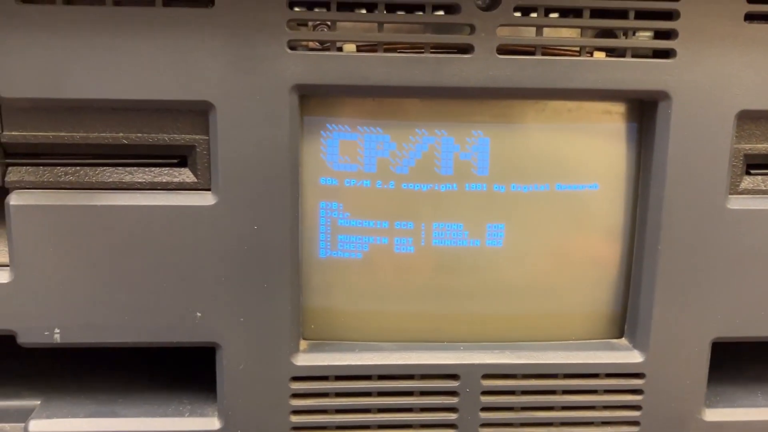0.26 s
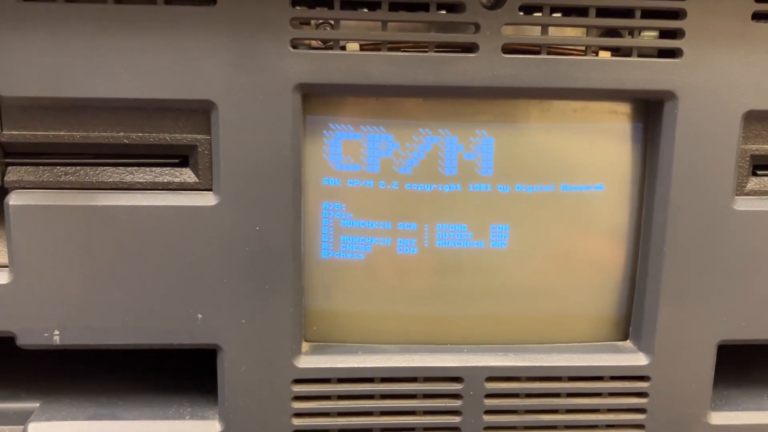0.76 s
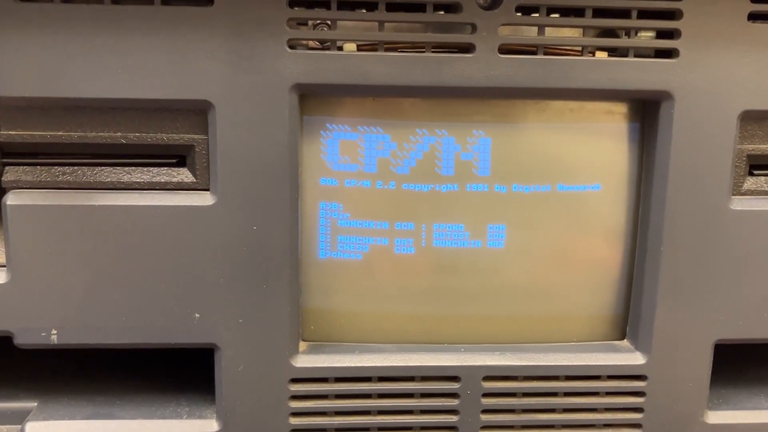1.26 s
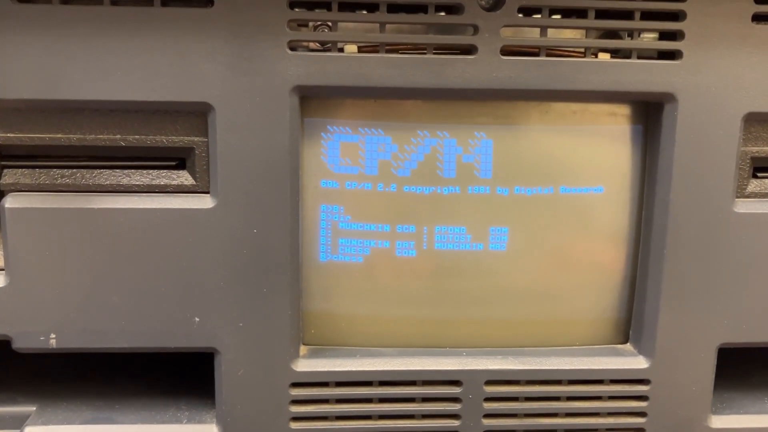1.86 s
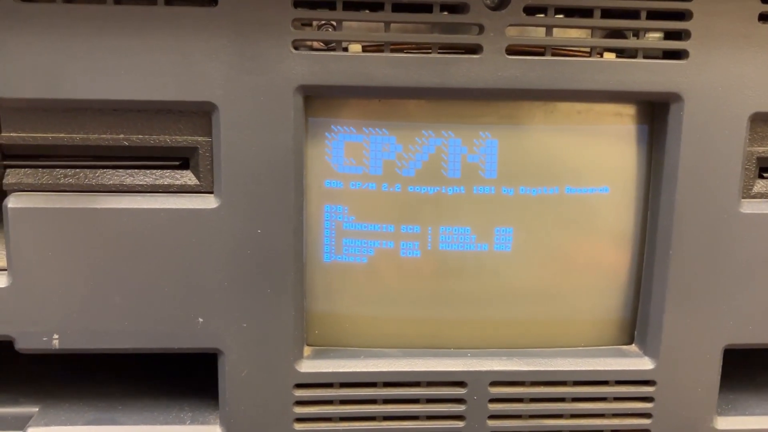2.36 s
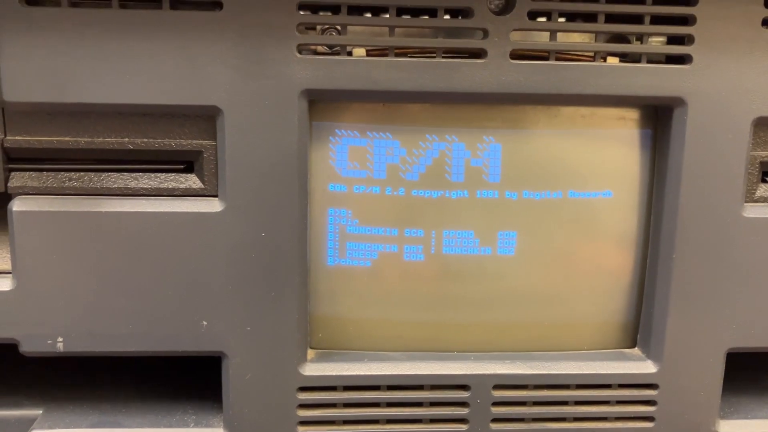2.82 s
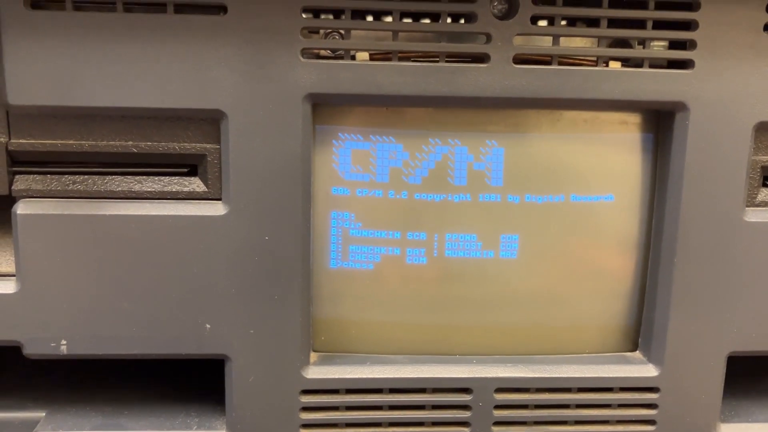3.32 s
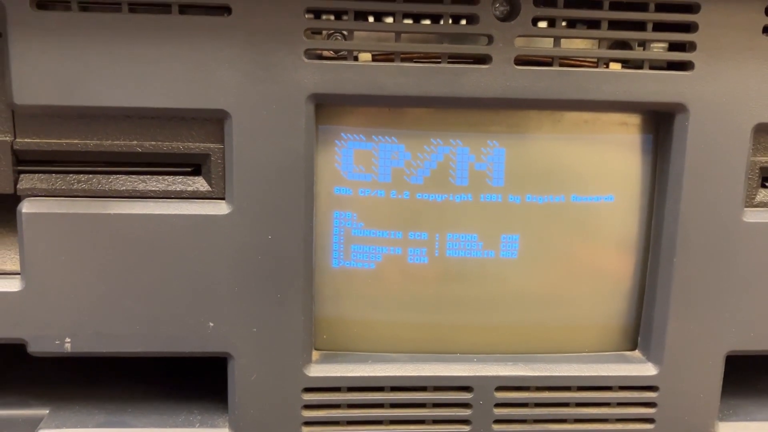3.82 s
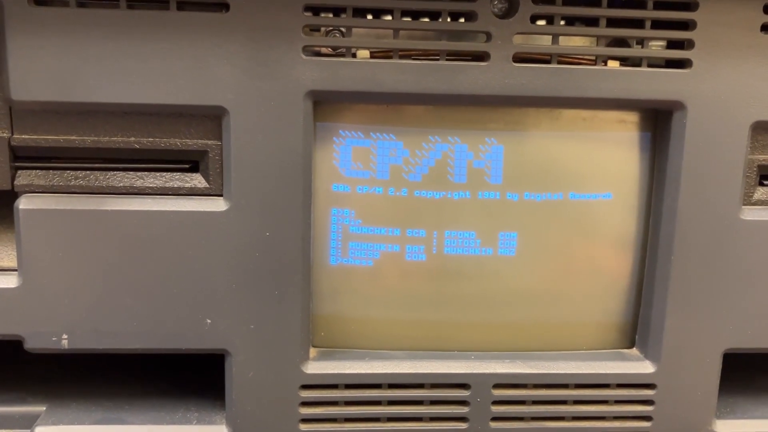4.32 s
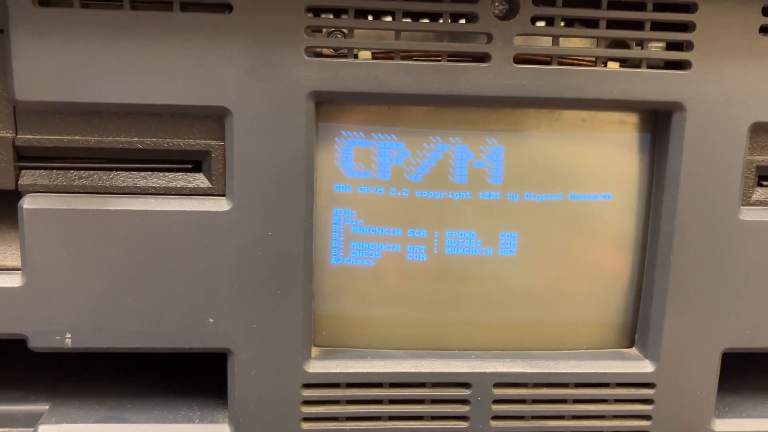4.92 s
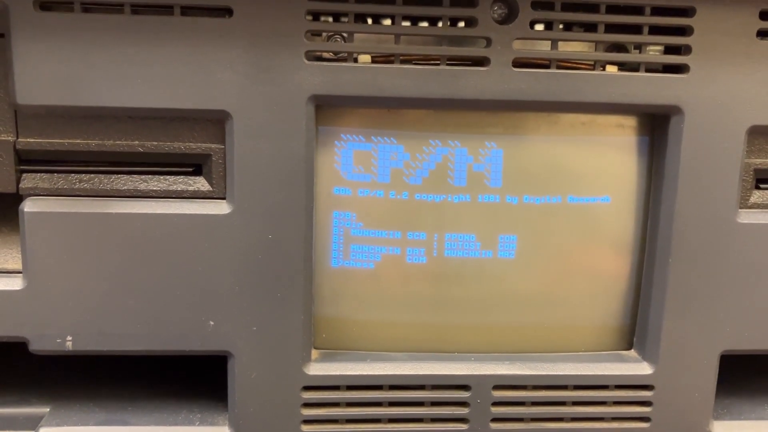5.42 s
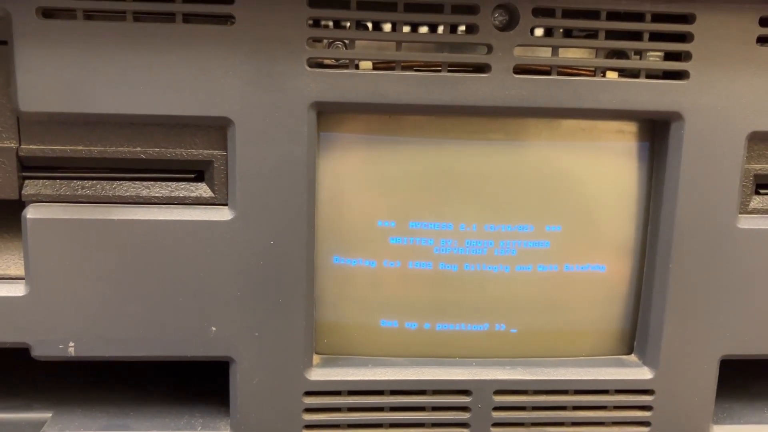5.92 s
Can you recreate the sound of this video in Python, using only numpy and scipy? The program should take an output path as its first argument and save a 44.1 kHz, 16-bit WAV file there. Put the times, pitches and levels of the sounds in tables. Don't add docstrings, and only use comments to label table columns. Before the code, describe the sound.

A close, dry indoor stereo take of an old computer with its disk drive working, about 6.2 seconds. Throughout, the motor gives an unsteady low-to-mid hum with faint bright bearing ticks about 37 times a second, a fan rushes softly, mains hum lies beneath, and the screen tube whines thinly, very high. At about 0.07, 0.67, 1.27, 1.87, 2.48 and 3.08 seconds the head steps: a soft click and, 0.02 seconds later, a firmer clack with a dull case thump and metallic rattle. From 3.7 to 4.35 it runs out as a harsh buzzing rasp at fifty steps a second, its rattle fluctuating. After a small snap near 4.45, a second rasp runs from 4.5 to 5.2, tighter and duller in the middle. Then only hum, air and whine remain. Low hand rumble and soft bumps appear, one strongest near 4.3.

```python
import sys
import numpy as np
from scipy import signal
from scipy.fft import rfft, irfft, next_fast_len
from scipy.io import wavfile
from scipy.ndimage import uniform_filter1d, map_coordinates

SR = 44100
rng = np.random.default_rng(int(sys.argv[2]) if len(sys.argv) > 2 else 0)


def amplitude_ratio(level_db):
    exponent = np.asarray(level_db, float) / 20
    return 10 ** exponent


def put_to_file(sound):
    columns = np.atleast_2d(sound).T
    safe = np.clip(columns, -1, 1)
    whole_steps = np.round(safe * 32767)
    wavfile.write(sys.argv[1], SR, whole_steps.astype(np.int16))


N = 272538

# t/s, slack/dB, case thump/dB
RUN_OUT = [
    (3.6788, 5, -39.5),
    (3.85, -2.5, -39),
    (3.89, -14, -45),
    (3.94, -8, -39),
    (3.96, 1.5, -36),
    (4.02, -4, -37),
    (4.06, -12.5, -39.5),
    (4.23, -2, -43),
    (4.27, -4, -38),
]
# t/s, slack/dB, case thump/dB
RUN_BACK = [
    (4.5135, -3, -37),
    (4.555, -7, -41.5),
    (4.58, -23, -47),
    (4.68, -19.5, -40.5),
    (4.755, -2.5, -41),
    (4.78, -25.5, -42),
    (5.0, -14.5, -41.5),
    (5.05, -4.5, -40),
    (5.15, -1.5, -37.5),
]
# t/s of the firm step, slack of the soft/dB, of the firm/dB
SINGLE_MOVES = [
    (0.0701, -7, 0),
    (0.6696, -13, 0.5),
    (1.271, -14, 2),
    (1.874, -9, 1),
    (2.4755, -9, 1),
    (3.0755, -4.5, -1.5),
]


def head():
    # f/Hz, width/Hz, level/dB
    carriage_rings = [(1064, 83, -7.5), (1380, 68, -6), (1520, 71, 1.5), (1810, 270, -3), (2020, 130, -2.5),
                      (2365, 255, -1), (2450, 174, 0.5), (2634, 340, -3)]
    # f/Hz, width/Hz, level/dB
    guide_rings = [(2650, 91, -33), (3470, 99, 8), (3790, 350, -1.5), (3976, 256, 6), (4107, 150, 6)]
    # f/Hz, width/Hz, level/dB
    strike_rings = [(5080, 600, -2), (5860, 600, -5.5), (6520, 300, -2), (7500, 320, -5), (8200, 220, -6.5),
                    (10800, 3200, -18)]
    # f/Hz, width/Hz, level/dB
    case_rings = [(94.4, 15.5, -4), (162, 33, -3), (213, 35.5, -2.5), (241, 26.4, -3), (367, 60, -16),
                  (477, 32, -6), (620, 26, -12.5), (748, 45, -10.5), (1002, 230, -26)]
    s, carriage_db, guide_db, strike_db, thump_db = steps()
    s = s - .0012
    carriage = bursts(s, carriage_db, length=.0125, fall_db=2.5, tail_db=-6.5, spiky_db=2)
    guide = bursts(s, guide_db, length=.0095, fall_db=2, tail_db=-18, spiky_db=2)
    strike = bursts(s + .0008, strike_db, length=0.0055, fall_db=4, tail_db=-5, spiky_db=1.5)
    scrape = ringing(carriage, carriage_rings) + ringing(guide, guide_rings)
    rattle = below(scrape, hz=4400) + ringing(strike, strike_rings)

    out_start, back_start = RUN_OUT[0][0], RUN_BACK[0][0]
    outward_s = 0.00762 - 0.0017 * np.maximum(s - out_start, 0)
    inward_s = .0098 + 0.0023 * (s - back_start)
    swing_s = np.where(s > back_start - .1, inward_s, outward_s)
    chance = rng.random((len(s), 3))
    kick = amplitude_ratio(thump_db + 30)
    kick_back = 0.42 * (1 + .2 * chance[:, 2]) * kick
    jolts = np.zeros(N)
    jolts[np.round((s + .0001 * chance[:, 0]) * SR).astype(int)] = kick
    jolts[np.round((s + swing_s + .0004 * chance[:, 1]) * SR).astype(int)] = -kick_back
    shudder = bursts(s, thump_db - 9, length=.014, fall_db=3, tail_db=-6, spiky_db=2)
    thump = amplitude_ratio(0.67) * below(ringing(jolts + shudder, case_rings), hz=1106)
    return rattle, thump


def steps():
    firm_s, soft_db, firm_db = np.transpose(SINGLE_MOVES)
    out_knot_s, out_slack_db, out_thump_db = np.transpose(RUN_OUT)
    back_knot_s, back_slack_db, back_thump_db = np.transpose(RUN_BACK)
    out_s = out_knot_s[0] + .0201 * np.arange(34)
    back_s = back_knot_s[0] + .02002 * np.arange(36)
    s = np.r_[firm_s - .0188, firm_s, out_s, back_s]
    same = np.zeros(len(firm_s))

    pulley_db = 3.5 * np.cos(2 * np.pi * (out_s - 3.72) / 0.0964)
    out_db = np.interp(out_s, out_knot_s, out_slack_db) + pulley_db
    slack_db = np.r_[soft_db, firm_db, out_db, np.interp(back_s, back_knot_s, back_slack_db)]
    out_jolt_db = np.interp(out_s, out_knot_s, out_thump_db)
    back_jolt_db = np.interp(back_s, back_knot_s, back_thump_db)
    thump_db = np.r_[same - 46.5, same - 40.5, out_jolt_db, back_jolt_db]

    # dB at slack 0, dB per dB of slack, step-to-step scatter dB
    laws = (-39, 0.55, 1.44), (-43.5, 1, 0.5), (-49.5, 0.93, 1.4)
    chance = rng.standard_normal((len(s), 5))
    parts_db = np.array([db + slope * slack_db + scatter_db * c
                         for (db, slope, scatter_db), c in zip(laws, chance.T)])
    parts_db += np.outer([-1, 2, -3.5], s < out_s[0])
    parts_db += np.outer([1, -0.5, -3], s >= back_s[0])
    take_up_db, take_up_s = 3.5, 0.021
    out_extra_db = take_up_db * np.exp((out_s[0] - out_s) / take_up_s)
    back_extra_db = take_up_db * np.exp((back_s[0] - back_s) / take_up_s)
    parts_db[0] += np.r_[same + 2, same, out_extra_db, back_extra_db]
    return s + .0002 * chance[:, 3], *parts_db, thump_db + 1.2 * chance[:, 4]


def snaps():
    # t/s, low level/dB, mid level/dB, bright level/dB
    clicks = [
        (2.028, -44.5, -54.5, -70),
        (3.9082, -36, -44.5, -46),
        (4.4486, -42, -49.5, -55),
    ]
    # f/Hz, width/Hz, level/dB
    snap_rings = [
        [(1840, 430, 1.5), (2490, 420, 5.5)],
        [(3520, 550, -7), (4130, 430, -3)],
        [(6200, 900, -20), (7797, 490, 8), (11000, 3000, -6)],
    ]
    settling = [(row[0] + 0.065, -55, -67, -80) for row in SINGLE_MOVES]
    s, *levels = np.transpose(list(clicks) + settling)
    total = np.zeros((2, N))
    for db, modes in zip(levels, snap_rings):
        contact = bursts(s, db + .6, length=0.0078, fall_db=7, tail_db=-4, spiky_db=1.5)
        total += ringing(contact, modes)
    return total


def spindle():
    orders = [7, 13, 14, 15, 17, 19, 20, 21, 22, 24, 42, 43, 45, 46, 48, 51, 53, 61, 66, 67, 68, 72, 74]
    # level/dB, left minus right/dB, unsteadiness/dB
    order_levels = [(-50, 2.5, 2), (-54, 0.5, 0), (-63.5, 18, -2), (-48.5, 3, 1.4), (-57.5, -6.5, 5),
                    (-64.5, -9, 4.5), (-61.5, -6, 4.5), (-48, -5, 2), (-57, 5.5, 4), (-56, 7.5, 2.5),
                    (-70, -15.5, 1), (-96, -19, 4.5), (-59, -3, 1.5), (-63.5, 6.5, -4.5), (-83, -11.5, 6),
                    (-69.5, -2, 3), (-67, 6, -0.5), (-68.5, 0, 1), (-97, -8, 18.5), (-66.5, -10, 7),
                    (-73.5, 9, 10.5), (-74, -3.5, 13.5), (-67, 0.5, 2)]
    # f/Hz, width/Hz, level/dB
    bearing_rings = [(9500, 330, -5.5), (10380, 190, 4), (11090, 240, -3), (12300, 650, -18)]
    shaft_hz = 37.031
    turns = shaft_hz * np.arange(N) / SR + 0.0031 * wobble(1.525)
    tones = np.zeros((2, N))
    for k, (db, pan_db, loose_db) in zip(orders, order_levels):
        loose_db = np.clip(loose_db, 0, 2.5)
        sway_db = loose_db * np.tanh(wobble(14))
        cycles = k * turns + rng.random() + 0.043 * loose_db * wobble(8)
        tone = amplitude_ratio(db + 2 + sway_db) * np.sin(2 * np.pi * cycles)
        tones += tone * amplitude_ratio(pan_db * np.array([[.5], [-.5]]))
    since = (turns - .47) % 1 / shaft_hz
    fade = amplitude_ratio(-60 * since / 0.034 + 0.69 * wobble(30))
    tick = fade * (1 - np.exp(-since / 0.0009)) * rng.standard_normal(N)
    return tones + amplitude_ratio(-63.5) * unit(ringing(tick, bearing_rings))


def fan():
    # f/Hz, level/dB per Hz
    roar = [(15, -48), (25, -4), (117, 2), (167, -1), (265, -4.5), (415, -13.5), (548, -14), (680, -11.5),
            (781, -11), (1000, -24), (1300, -68), (2200, -120)]
    # f/Hz, level/dB per Hz
    hiss = [(800, -12), (1050, -6), (1650, 3.5), (2200, -2.5), (2800, -2), (3200, -10), (5000, -11),
            (5800, -16.5), (7000, -52.5), (8500, -7.5), (10400, -9.5), (12000, -14), (13000, -10.5),
            (14500, -30)]
    t = np.arange(N) / SR
    hum = amplitude_ratio(-43.5 + 1.4 * wobble(11)) * np.sin(2 * np.pi * 120 * t + .5 * wobble(12))
    low_air = amplitude_ratio(-41.0 + 0.94 * wobble(2.564)) * rush(roar, patchy_db=1.5)
    high_air = amplitude_ratio(-54.5) * rush(hiss, patchy_db=0.5)
    return low_air + high_air + hum


def tube():
    # t/s, level/dB
    whine = [(0.0, -62), (0.7, -62.5), (1.27, -62), (2.43, -61), (3.54, -57), (4.78, -59), (5.03, -61),
             (5.96, -58), (6.18, -61)]
    lead = np.array([[.09], [-.09]])
    level_db = curve(whine) + 7.5 + .5 * wobble(25)
    return amplitude_ratio(level_db) * np.sin(2 * np.pi * 15602.17 * np.arange(N) / SR + lead)


def hand():
    # t/s, level/dB
    rumble = [(0.0, -45), (1.29, -46), (1.65, -48), (2.1, -43), (2.39, -51), (2.49, -40), (2.81, -46.5),
              (3.2, -48.5), (3.72, -45), (4.3, -39), (5.04, -45.5), (5.18, -46), (6.18, -45.5)]
    # centre t/s, peak level/dB, f/Hz, length/s
    bumps = [(.203, -28, 85, 0.024), (0.619, -25, 60, 0.02), (1.171, -31, 60, 0.037),
             (1.312, -26.5, 57.3, 0.068), (1.868, -24.5, 68.6, 0.034), (2.401, -33.5, 60, 0.052),
             (2.455, -23, 81.4, 0.026), (2.475, -23, 60, 0.043), (3.075, -27, 70, 0.02),
             (3.307, -30, 60, .035), (4.323, -21, 67.5, 0.02)]
    low = [(20, -4), (35, 1), (50, -1), (80, -1.5), (120, -28), (200, -47)]  # f/Hz, level/dB per Hz
    lumps = amplitude_ratio(4 * np.tanh(wobble(9))) * rush(low, patchy_db=1.5)
    x = amplitude_ratio(curve(rumble)) * unit(lumps)
    t = np.arange(N) / SR
    for s, db, hz, length in bumps:
        u = np.clip((t - s) / length, -.5, .5)
        swell = np.cos(np.pi * u) ** 1.44
        x -= amplitude_ratio(db) * swell * np.cos(2 * np.pi * hz * (t - s)) * amplitude_ratio([[1.5], [-1.5]])
    return x


def room(x, t60):
    t = np.arange(SR // 4) / SR
    tail = rng.standard_normal((2, len(t))) * amplitude_ratio(-60 * t / t60)
    late = np.pad(x[:1], ((0, 0), (90, 0)))
    return signal.fftconvolve(late, tail / np.linalg.norm(tail[0]), axes=1)[:, :N]


def pair(x, left_more):
    # f/Hz, lag/radians
    left_lag = [(0, 0), (1000, 0), (2300, 1.7), (2800, 2), (3150, 4.6), (3600, 5), (4300, 6.3), (5700, 9.6),
                (6100, 12.57), (7600, 12.57), (8700, 15.7), (9400, 15.7), (10900, 18.85), (11800, 18.85),
                (13100, 22), (14600, 22)]
    f, lag = np.transpose(left_lag)

    def both(hz):
        half = amplitude_ratio(along(left_more, hz) / 2) * np.exp(-.5j * np.interp(hz, f, lag))
        return np.array([half, 1 / half])

    return filtered(x * np.ones((2, 1)), both)


def bursts(times, levels_db, length, fall_db, tail_db, spiky_db, apart=0.55):
    x = np.zeros((2, N + SR))
    t = np.arange(SR // 20) / SR
    shape = amplitude_ratio(-fall_db * t / length) * np.where(t < length, 1, amplitude_ratio(tail_db))
    shape = shape * (1 - np.exp(-t / .0004)) * (1 + 1.1 * np.exp(-t / .001))
    for s, db in zip(times, levels_db):
        bounces = amplitude_ratio(spiky_db * rng.standard_normal(len(t) // 16 + 1)).repeat(16)[:len(t)]
        shared, own = rng.standard_normal((2, len(t)))
        chatter = shape * bounces * (shared + apart * np.outer([1, -1], own))
        x[:, round(s * SR):][:, :len(t)] += amplitude_ratio(db) * np.sqrt(length / t[-1]) * unit(chatter)
    return x[:, :N]


def ringing(x, modes):
    def shape(f):
        total = 0
        for k, (c, w, db) in enumerate(modes):
            total = total + (-1) ** k * amplitude_ratio(db) * 1j * f * w / (c * c - f * f + 1j * f * w)
        return total

    power = np.mean(np.abs(shape(np.linspace(1, SR / 2, num=4096))) ** 2)
    return filtered(x, shape) / np.sqrt(power)


def rush(spectrum, patchy_db):
    # f/Hz, likeness/0-1
    alike = [(30, .5), (90, .3), (200, .7), (350, .87), (600, .88), (1200, .65), (2200, .7), (3000, .45),
             (5500, .25), (6500, .8), (8700, .96), (9300, .985), (10500, .85), (14000, .95)]
    z = signal.stft(rng.standard_normal((2, N)), nperseg=512)[2]
    patches = uniform_filter1d(rng.standard_normal(z.shape[1:]), size=6, axis=0)
    patches = uniform_filter1d(patches, size=14, axis=1)
    two = signal.istft(z * amplitude_ratio(patchy_db * unit(patches)), nperseg=512)[1][:, :N]

    def mid_and_side(hz):
        turn = np.arccos(np.clip(along(alike, hz), 0, 1)) / 2
        return amplitude_ratio(along(spectrum, hz)) * np.array([np.cos(turn), np.sin(turn)])

    mid, side = filtered(two, mid_and_side)
    return unit(np.array([mid + side, mid - side]))


def wobble(rate):
    coarse = np.arange(0, N + 64, 64)
    knots = rng.standard_normal(int(N * rate / SR) + 4)
    return np.interp(np.arange(N), coarse, map_coordinates(knots, [coarse * rate / SR]))


def curve(rows):
    return np.interp(np.arange(N) / SR, *np.transpose(rows))


def along(points, hz):
    f, v = np.transpose(points)
    return np.interp(np.log(hz + 1), np.log(f + 1), v)


def filtered(x, response):
    m = next_fast_len(N + SR // 8, real=True)
    return irfft(rfft(x, m) * response(np.fft.rfftfreq(m, 1 / SR)), m)[..., :N]


def below(x, hz):
    return signal.sosfilt(signal.butter(6, hz, fs=SR, output="sos"), x)


def unit(x):
    return x / np.sqrt(np.mean(x ** 2) + 1e-20)


def scene():
    # f/Hz, level/dB
    head_left_more = [(60, 0), (700, 2), (1300, 6.5), (2400, 7), (3300, 5), (3700, 2), (4300, 1), (4600, 0),
                      (16000, 0)]
    # f/Hz, level/dB
    motor_left_more = [(60, -1), (700, 2), (1300, 3.5), (2400, 8.5), (3300, 5), (5500, 7), (6100, -15.5),
                       (16000, 6)]
    rattle, thump = head()
    hits = rattle + snaps() + thump
    walls = amplitude_ratio(-15) * room(hits, t60=0.06)
    machine = pair(hits + walls, head_left_more) + pair(spindle() + fan(), motor_left_more)
    return machine + tube() + hand()


def top_cut(x):
    return signal.sosfilt(signal.butter(12, 16730, fs=SR, output="sos"), x)


def record(dry):
    mix = filtered(dry, lambda hz: (hz < 15850) * hz ** 4 / (hz ** 4 + 32 ** 4))
    return top_cut(mix)


dry = scene()
out = record(dry)
put_to_file(out)
```